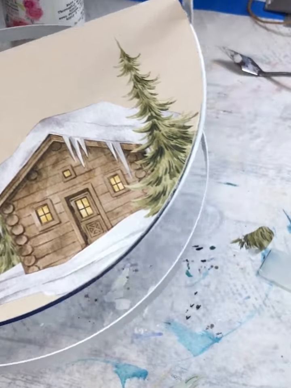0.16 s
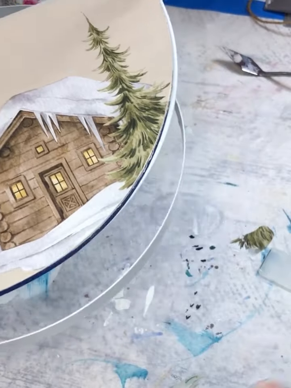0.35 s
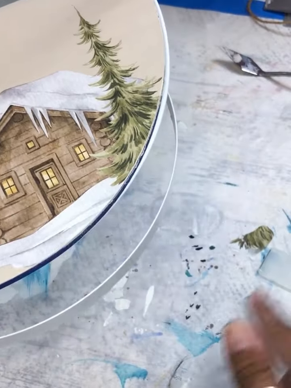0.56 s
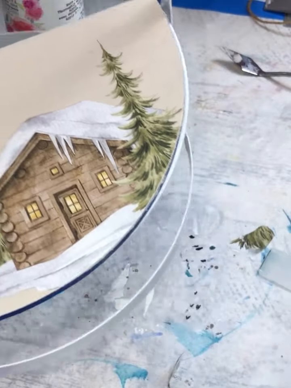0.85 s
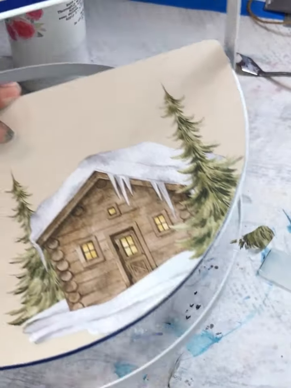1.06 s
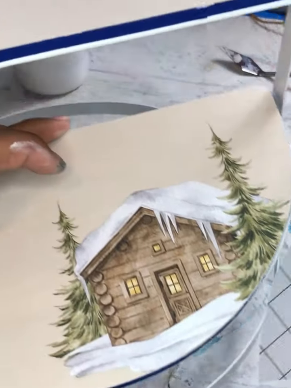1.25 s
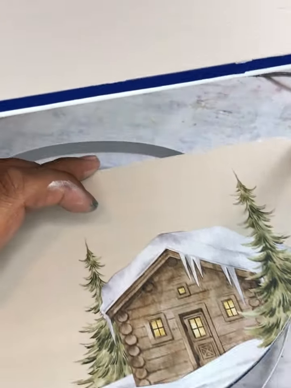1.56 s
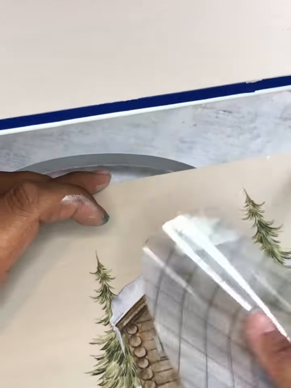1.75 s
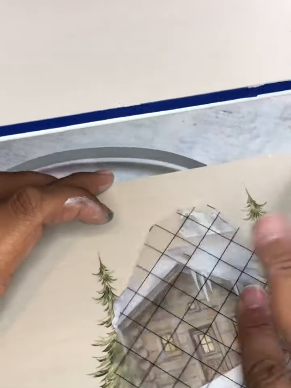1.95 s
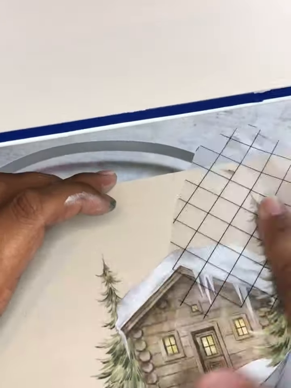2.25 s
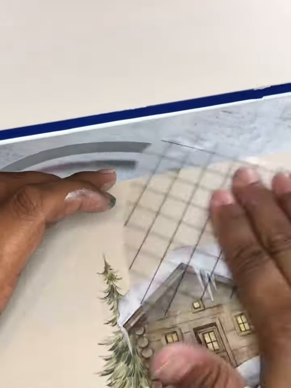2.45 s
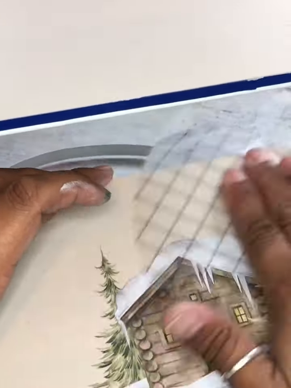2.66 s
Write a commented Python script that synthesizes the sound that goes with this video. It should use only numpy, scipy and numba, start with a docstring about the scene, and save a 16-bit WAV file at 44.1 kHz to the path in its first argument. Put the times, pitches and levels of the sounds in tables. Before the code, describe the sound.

A stiff plastic sheet crinkles and snaps, then fingers rub it down with a scratchy rasp.

```python
"""A soft, close rasp of sliding plastic, then sharp snaps: a stiff transfer sheet is handled,
laid on a round sign and rubbed down hard with the fingers.
The film hisses and rasps by stick-slip, wobbles as it bends and snaps as it buckles;
the board bumps softly underneath. A small room with a faint hum surrounds it."""
import sys
import numpy as np
from scipy import signal
from scipy.fft import rfft, irfft
from scipy.io import wavfile
from scipy.ndimage import uniform_filter1d
from numba import njit

SR = 44100
rng = np.random.default_rng(int(sys.argv[2]) if len(sys.argv) > 2 else 0)


def master(y):
    """Save y as 16-bit WAV."""
    cut = np.clip(np.atleast_2d(y).T, -1, 1)
    pcm = np.round(cut * 32767)  # scale
    wavfile.write(sys.argv[1], SR, pcm.astype(np.int16))


N = 123479


def undb(db):
    """Decibels to gain."""
    return 10 ** (np.asarray(db) / 20)


def unit(x):
    """Scale to rms 1."""
    return x / np.sqrt(np.mean(x ** 2) + 1e-18)


def add(out, start_s, x):
    """Mix x into out at start_s."""
    i = max(int(start_s * SR), 0)
    out[i:i + len(x)] += x[:max(len(out) - i, 0)]


@njit
def svf(x, hz, rel_width):
    """State-variable band-pass, one centre per sample."""
    y, band_state, low_state = np.empty(len(x)), 0., 0.
    for i in range(len(x)):
        g = np.tan(np.pi * min(hz[i], .44 * SR) / SR)
        v = (band_state + g * (x[i] + 1e-18 - low_state)) / (1 + g * (g + rel_width))
        band_state = 2 * v - band_state
        low_state += 2 * g * v
        y[i] = rel_width * v
    return y


def band(x, hz, rel_width):
    """One resonance, fixed or moving; rel_width = width / centre."""
    return svf(x, hz * np.ones(len(x)), float(rel_width))


def band_noise(n, hz, rel_width):
    """Noise through two equal resonances in series."""
    return band(band(rng.standard_normal(n), hz, rel_width), hz, rel_width)


def colour(x, spectrum):
    """Shape x by (frequency [Hz], level [dB]) points, at rms 1."""
    hz, db = np.array(spectrum).T
    bin_hz = np.arange(N // 2 + 1) * SR / N
    gain = undb(np.interp(np.log(bin_hz + 1), np.log(hz), db))
    return unit(irfft(rfft(x) * gain, N))


def wander(per_s):
    """Slewed random steps, rms 1."""
    hold = max(int(SR / per_s), 2)
    steps = np.repeat(rng.standard_normal(N)[:N // hold + 1], hold)
    return unit(uniform_filter1d(steps, hold))[:N]


def catches(per_s, spread_db):
    """Tiny stick-slip clicks of uneven size."""
    hit = rng.random(N) < per_s / SR
    sign = rng.choice([-1., 1.], N)
    return hit * sign * undb(spread_db * np.minimum(rng.exponential(size=N), 4))


# room air spectrum (frequency [Hz], level [dB])
AIR_SPECTRUM = [(20, -30), (55, 4), (90, 1.5), (160, -1), (300, 4), (450, -8.5), (1500, -10.5), (5000, -27),
                (16000, -51)]
# hum bands (centre [Hz], width [Hz], level [dB])
HUM_BANDS = [(57.7, 11, -66.5), (228.5, 26, -60.5), (302.3, 63, -64.5)]

def background(air_db=-58):
    """Room air and a wavering low hum."""
    hum = sum(undb(db) * unit(band_noise(N, hz, width_hz / hz)) for hz, width_hz, db in HUM_BANDS)
    return hum + undb(air_db) * colour(rng.standard_normal(N), AIR_SPECTRUM)


def room_echo(x, level_db=-17, t60_s=0.16, gap_s=0.0028):
    """Short diffuse echo of desk and walls."""
    t = np.arange(SR // 3) / SR
    tail = band(rng.standard_normal(len(t)), hz=2150, rel_width=4.8)
    tail *= undb(-60 * t / t60_s) * (t > gap_s)
    return undb(level_db) * signal.fftconvolve(x, tail / np.sqrt(np.sum(tail ** 2)))[:N]


# board modes (frequency [Hz], gain [dB], t60 [s])
BOARD_MODES = [(94, -4.5, 0.52), (132, 2.5, 0.21), (174, 4.5, 0.12), (231.4, 5.5, 0.06), (426, 18, 0.03)]
# hand landings (time [s], drive [dB])
LANDINGS = [(0.481, -48), (1.545, -49.5), (1.735, -40), (1.92, -39), (2.066, -45.5), (2.135, -37.5),
            (2.529, -47.5), (2.753, -43.5)]

def board_bumps(settle_s=0.0075):
    """The hand settles on the board and stirs its low modes."""
    out, t = np.zeros(N), np.arange(SR // 2) / SR
    for start_s, drive_db in LANDINGS:
        phases = rng.uniform(0, 2 * np.pi, len(BOARD_MODES))
        ring = sum(undb(db - 60 * t / t60_s) * np.sin(2 * np.pi * hz * t + phase)
                   for (hz, db, t60_s), phase in zip(BOARD_MODES, phases))
        add(out, start_s, undb(drive_db) * ring * (1 - np.exp(-t / settle_s)))
    return out


# film modes (frequency [Hz], width [Hz], relative level [dB])
FILM_MODES = [(960, 20, 0), (1513, 26, -1.5), (2133, 210, -7), (2590, 77, -4), (2760, 150, -5),
              (4070, 69, -10), (5300, 98, -7)]

def film_resonance(x, gain_db=-4):
    """The film's modes ring along with x."""
    return sum(undb(db + gain_db) * band(x, hz, width_hz / hz) for hz, width_hz, db in FILM_MODES)


def ticks(level_db=-70):
    """The held film lets out faint stray ticks."""
    return undb(level_db) * unit(band(catches(per_s=45, spread_db=1), hz=5400, rel_width=2))


# sheet flexes (time [s], swell [s], level before trim [dB], pitch at crest [Hz])
FLEXES = [(.078, 0.0056, -47, 1110), (.105, 0.0072, -48, 1280), (.18, 0.0049, -40, 940),
          (0.281, 0.0066, -38.5, 1660), (0.576, 0.0055, -46.5, 1300), (0.697, 0.011, -46, 940),
          (.722, 0.013, -43.5, 1180), (0.761, 0.014, -43.5, 1250), (.922, 0.0045, -38, 1150),
          (1.543, 0.0092, -47, 1400), (1.725, 0.0035, -35.5, 337), (1.764, 0.006, -38, 1340),
          (1.838, 0.0049, -28, 1100), (1.904, 0.013, -38, 1710), (1.915, 0.0031, -28, 650),
          (1.924, 0.024, -41.5, 616), (1.997, 0.012, -43, 910), (2.064, 0.012, -38, 675),
          (2.099, 0.0085, -40, 920), (2.153, 0.0084, -40.5, 670), (2.269, 0.012, -42.5, 1156),
          (2.437, 0.0072, -38.5, 1030), (2.522, 0.0026, -29.5, 766), (2.668, 0.011, -34, 1050),
          (2.715, 0.0075, -30, 850), (2.74, 0.0039, -33.5, 800)]

def bends(trim_db=2, sag_power=0.74):
    """The sheet flexes with a hollow flutter; low bending waves arrive last, so the pitch falls."""
    out, t = np.zeros(N), np.arange(SR // 6) / SR
    for start_s, swell_s, db, hz in FLEXES:
        age = t / swell_s
        swell = age * np.exp(1 - age)
        falling_hz = hz / ((1 + age) / 2) ** sag_power
        flutter = unit(swell * band_noise(len(t), falling_hz, rel_width=1.52))
        add(out, start_s, flutter * np.sqrt(np.mean(swell ** 2)) * undb(db + trim_db))
    return out


# smooth slides (start [s], end [s], level [dB], mid pitch [Hz])
SMOOTH_SLIDES = [(0, 0.06, -50, 3000), (0.057, 0.146, -50, 10000), (0.191, 0.303, -47, 3340),
                 (1.558, 1.659, -53, 8150), (2.412, 2.444, -29.5, 6700)]

def scrapes(rise_octaves_per_s=0.76):
    """A smooth slide sings in one narrow resonance that rises as it gathers speed."""
    out = np.zeros(N)
    for start_s, end_s, db, hz in SMOOTH_SLIDES:
        t = np.arange(int((end_s - start_s) * SR)) / SR
        rising_hz = hz * 2 ** (rise_octaves_per_s * (t - t.mean()))
        voice = unit(band_noise(len(t), rising_hz, rel_width=0.26))
        add(out, start_s, undb(db) * voice * np.sin(np.pi * t / t[-1]))
    return out


def moving_contact(x, depth_db=3.5):
    """The contact patch moves, so each half octave swells and fades on its own."""
    centres_hz = 500 * 2 ** np.arange(0, 5.1, .5)
    return unit(sum(band(x, hz, .5) * undb(depth_db * wander(per_s=35)) for hz in centres_hz))


def stroke_envelope(start_s, peak_s, end_s, db, firm_db=-20, ease_db=31, linger_s=0.0055):
    """A stroke swells and lets go, lighter ones more gently; the film rustles on briefly."""
    t = np.arange(N) / SR
    rise = (t - start_s) / max(peak_s - start_s, 1e-3)
    fall = (end_s - t) / max(end_s - peak_s, 1e-3)
    arch = np.sin(np.pi / 2 * np.clip(np.minimum(rise, fall), 0, 1))
    lightness = np.exp((firm_db - db) / ease_db)
    pressure = arch ** (np.where(t < peak_s, 0.5, 0.95) * lightness)
    pole = np.exp(-1 / (linger_s * SR))
    return np.maximum(pressure, signal.lfilter([1 - pole], [1, -pole], pressure))


# friction spectra (frequency [Hz], level [dB])
HISS_SPECTRUM = [(500, -8.5), (2000, -14), (4200, -3.5), (5700, -2), (9000, 3), (13000, -1.5), (15300, 3.5),
                 (16500, -6.5)]
RASP_SPECTRUM = [(150, 8), (500, -0.5), (1100, -2.5), (1900, 5), (2800, -0.5), (4200, 1.5), (7000, -23.5),
                 (16000, -47)]
# sliding strokes (start [s], peak [s], end [s], hiss before trim [dB], rasp before trim [dB])
RUB_STROKES = [(-.04, 0.014, 0.061, -47, -45), (0.05, 0.11, 0.27, -50.5, -48.5),
               (0.16, 0.27, 0.32, -38.5, -46), (0.313, 0.323, 0.35, -42, -42),
               (0.342, 0.358, 0.49, -59.5, -45), (0.477, 0.497, 0.58, -53.5, -49),
               (0.535, 0.687, 0.81, -52.5, -47), (0.795, 0.89, 1.015, -53.5, -47.5),
               (1.004, 1.089, 1.228, -52, -47.5), (1.255, 1.334, 1.78, -62, -54.5),
               (1.533, 1.65, 1.774, -50.5, -49.5), (1.737, 1.792, 2.006, -37, -38.5),
               (1.978, 2.047, 2.142, -39, -44.5), (2.123, 2.217, 2.258, -32.5, -49.5),
               (2.266, 2.346, 2.36, -28.5, -34.5), (2.386, 2.428, 2.497, -28.5, -40.5),
               (2.495, 2.558, 2.57, -26.5, -54), (2.601, 2.618, 2.72, -28, -37.5),
               (2.652, 2.681, 2.745, -42, -27.5), (2.706, 2.77, 2.795, -24, -39)]

def rubbing(hiss_trim_db=-1, rasp_trim_db=-1.5, grit_re_hiss_db=-8):
    """Film and fingers slide: fine catches hiss, coarser ones rasp, small creases give way as grit."""
    judder_db = wander(per_s=150)
    fine = moving_contact(catches(per_s=9700, spread_db=1))
    coarse = moving_contact(catches(per_s=6000, spread_db=3.2))
    hiss = colour(fine, HISS_SPECTRUM) * undb(judder_db)
    rasp = colour(coarse, RASP_SPECTRUM) * undb(1.8 * judder_db)
    grit = undb(grit_re_hiss_db) * unit(band(catches(per_s=260, spread_db=2), hz=5400, rel_width=1))
    out = np.zeros(N)
    for start_s, peak_s, end_s, hiss_db, rasp_db in RUB_STROKES:
        friction = undb(hiss_db + hiss_trim_db) * (hiss + grit) + undb(rasp_db + rasp_trim_db) * rasp
        out += stroke_envelope(start_s, peak_s, end_s, hiss_db) * friction
    return out


def panel_ring(t, snap_hz, anchor_hz=1296, spread_octaves=0.6, decay_s=0.0066):
    """Six random modes of the film beside a crease; smaller, higher creases have higher ones."""
    centre_hz = np.sqrt(snap_hz * anchor_hz)
    ring = sum(size * np.sin(2 * np.pi * centre_hz * 2 ** (spread_octaves * offset) * t)
               for offset, size in rng.standard_normal((6, 2)))
    return unit(ring * np.exp(-t / decay_s))


def crease_pops(t, crackle_s, splinters_per_s=8000, splinter_gain=0.61):
    """A crease gives way: one main pop amid smaller splinters."""
    hit = rng.random(len(t)) < splinters_per_s / SR
    sign = np.sign(rng.standard_normal(len(t)))
    swell = np.sin(np.pi * np.minimum(t / (2 * crackle_s), 1) ** .5) ** 2
    pops = splinter_gain * hit * sign * swell
    pops[int(crackle_s * SR / 2)] = 1
    return pops


# buckles (time [s], level over SNAP_SPAN_S [dB], pitch [Hz], width / pitch, crackle [s])
BUCKLES = [(0.1789, -30.5, 2960, 0.49, 0.004), (0.1859, -28, 4800, 14, 0.0051),
           (0.2771, -27.5, 4870, 0.77, 0.0057), (0.2804, -24.5, 10700, 6, 0.0014),
           (0.287, -33, 2030, 0.2, 0.012), (0.2925, -36, 11000, 1.3, 0.0022),
           (0.3555, -31.5, 7250, 0.33, 0.003), (0.3636, -27.5, 2200, 1.1, 0.0027),
           (.375, -34, 1980, 0.12, 0.0079), (0.439, -51, 6900, 2.4, 0.0026),
           (0.601, -42.5, 3570, 0.62, .003), (0.6984, -38, 2240, 0.46, 0.0027),
           (0.9219, -36, 2340, 0.53, 0.0026), (1.0945, -34, 1620, 0.18, 0.0028),
           (1.339, -44.5, 2220, 0.33, 0.0037), (1.408, -66, 7000, 2, 0.0015),
           (1.54, -56, 2340, 0.63, 0.0012), (1.3834, -48.5, 3770, 2.6, 0.0043),
           (1.393, -50.5, 3930, 3.7, 0.00085), (1.424, -47, 3260, 2, 0.0021),
           (1.6451, -34, 2310, 0.64, 0.0022), (1.737, -33.5, 2120, 0.44, 0.0036),
           (1.7631, -21.5, 7500, 9.9, 0.00087), (1.7998, -26, 3530, 0.21, 0.00068),
           (1.818, -28.5, 4540, 1.2, .004), (1.836, -31.5, 3560, 1.72, 0.0047),
           (2.1015, -25.5, 4300, 1, 0.0054), (2.322, -35, 6500, 1.6, 0.003),
           (2.356, -31.5, 5160, 0.68, 0.00785), (2.4378, -13, 5660, 0.45, 0.002),
           (2.442, -22, 4700, 0.72, 0.0015), (2.5236, -20, 5500, 1.0, 0.008),
           (2.5391, -16, 2680, 0.27, 0.00039), (2.541, -26, 4800, 1.3, 0.0039),
           (2.5478, -15.5, 2625, 0.11, 0.00072), (2.554, -27, 1890, 0.11, 0.0034),
           (2.6175, -25, 2260, 0.27, 0.0039), (2.64, -13, 5331, 0.7, .002),
           (2.67, -19.5, 3765, 3.5, 0.0021), (2.6741, -16, 3050, 1.9, 0.0015),
           (2.681, -24, 6430, 1.7, 0.0017), (2.743, -16.5, 5770, 1.3, 0.0044),
           (2.758, -22, 3470, 0.49, 0.0044), (2.7676, -16.5, 2520, 0.36, 0.00061),
           (2.78, -30, 2600, 0.41, 0.0046)]
SNAP_SPAN_S = 0.006
TRAVEL_S, TRAVEL_HZ = 0.00019, 2920  # bending-wave delay at this pitch; higher waves arrive sooner

def snaps(ring_db=-1.5, ring_s=0.0044, sag_power=0.18, panel_db=-11):
    """The film buckles with a crackle and rings on briefly, its pitch sinking."""
    out, t = np.zeros(N), np.arange(SR // 16) / SR
    bin_hz = np.arange(len(t) // 2 + 1) * SR / len(t)
    dispersion = np.exp(-4j * np.pi * TRAVEL_S * np.sqrt(TRAVEL_HZ * bin_hz))
    for start_s, db, hz, rel_width, crackle_s in BUCKLES:
        crackle = unit(band(crease_pops(t, crackle_s), hz, rel_width))
        drive = rng.standard_normal(len(t)) * np.exp(-t / ring_s) * np.minimum(t / crackle_s, 1)
        sinking_hz = hz / (1 + t / ring_s) ** sag_power
        ring = undb(ring_db) * unit(band(drive, sinking_hz, rel_width))
        panel = undb(panel_db) * panel_ring(np.maximum(t - crackle_s / 2, 0), hz)
        snap = irfft(rfft(crackle + ring + panel) * dispersion, len(t))
        add(out, start_s, unit(snap) * undb(db) * np.sqrt(SNAP_SPAN_S / t[-1]))
    return out


def scene():
    """Sheet and board in the room, mono."""
    sheet = snaps() + rubbing() + scrapes() + ticks() + bends()
    sheet += film_resonance(sheet)
    return (sheet + room_echo(sheet) + board_bumps() + background())[None]


def record(dry, low_hz=48, top_hz=15900):
    """Bass cut, soft peak rounding, steep top cut."""
    highpass = signal.butter(4, low_hz, "highpass", fs=SR, output="sos")
    lowpass = signal.ellip(10, .2, 70, top_hz, fs=SR, output="sos")
    rounded = np.tanh(signal.sosfilt(highpass, dry))
    return signal.sosfilt(lowpass, rounded)


dry = scene()
out = record(dry)
master(out)
```